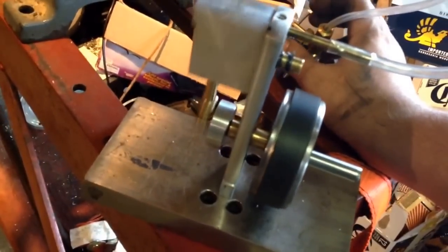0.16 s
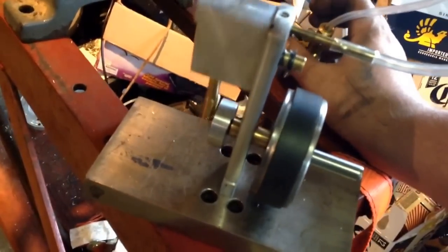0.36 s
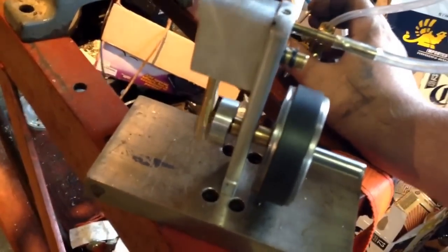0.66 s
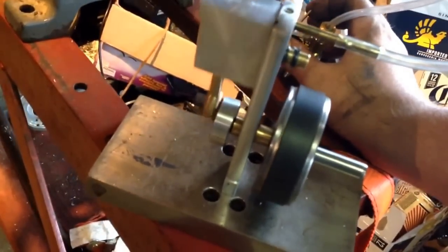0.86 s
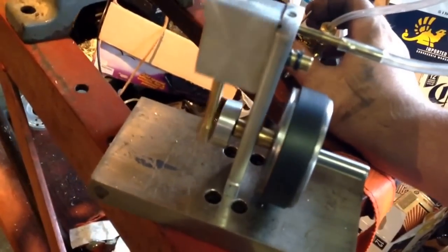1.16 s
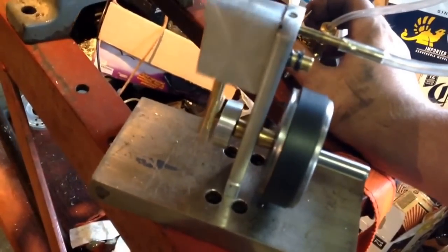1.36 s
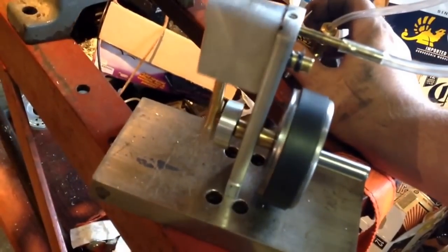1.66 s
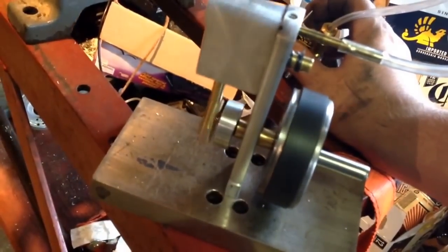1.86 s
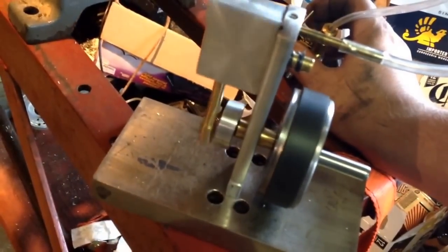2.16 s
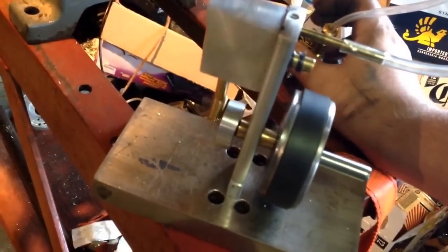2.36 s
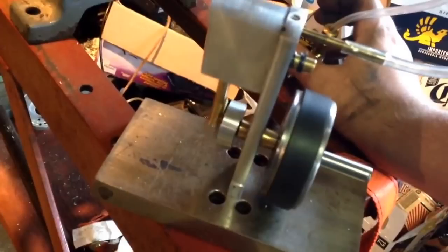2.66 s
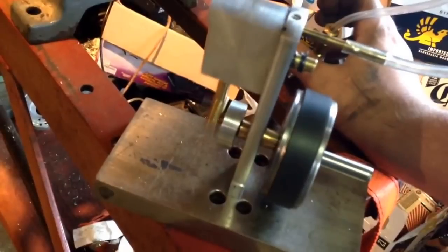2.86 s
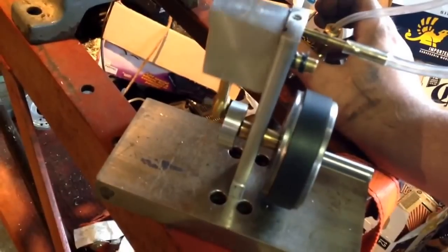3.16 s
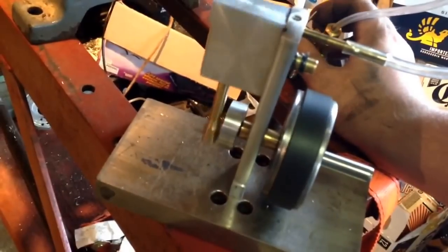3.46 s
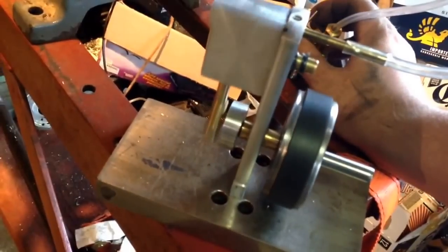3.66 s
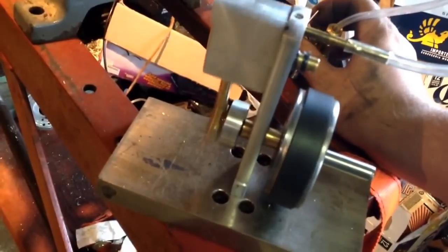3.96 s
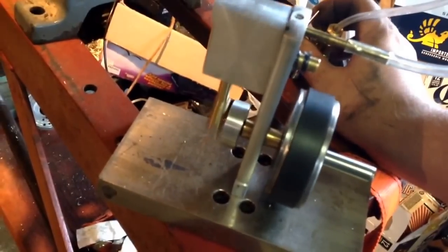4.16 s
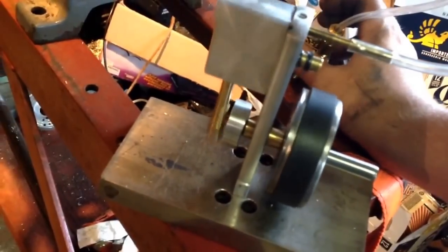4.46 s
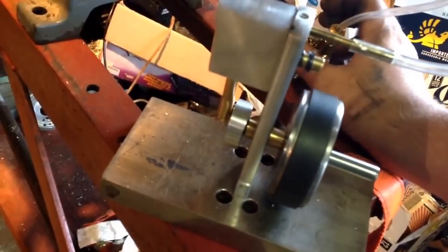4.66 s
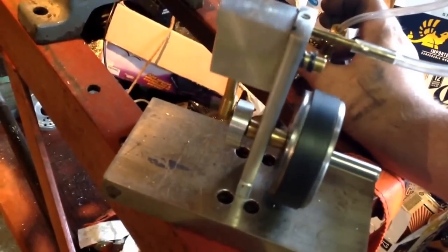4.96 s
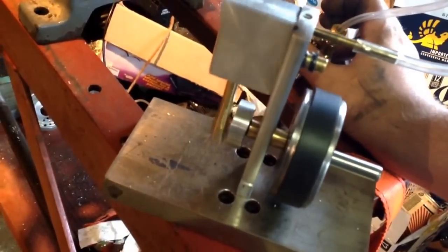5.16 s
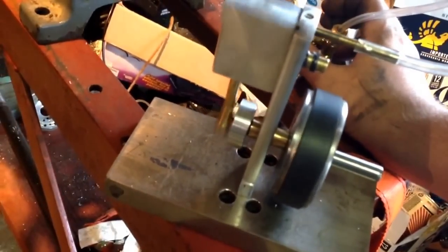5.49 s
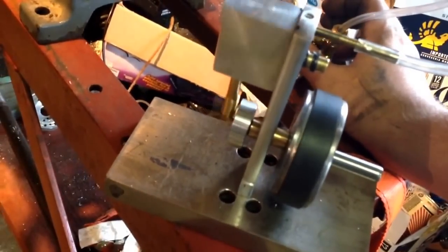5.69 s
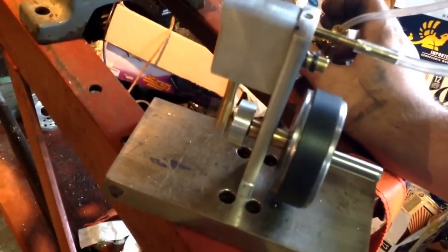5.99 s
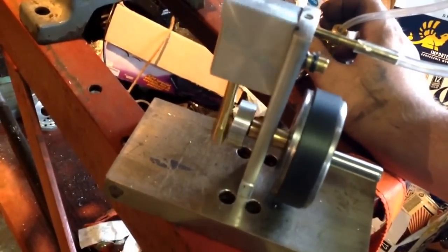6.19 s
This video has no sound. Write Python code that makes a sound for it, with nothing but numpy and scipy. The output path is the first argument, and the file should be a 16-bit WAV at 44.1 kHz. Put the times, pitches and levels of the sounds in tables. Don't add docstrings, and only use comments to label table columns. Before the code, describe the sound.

A steady high air hiss and dim workshop murmur run throughout. Over them, a little compressed-air engine beats at once with fast spitting puffs, one stroke stronger and chuffing lower, the other crisper after a tiny tick. The beat loosens gradually without stopping. Close, dry camera sound in a small workshop, with little bass and slightly dulled extreme treble.

```python
import sys
import numpy as np
from scipy import signal
from scipy.fft import rfft, irfft, next_fast_len
from scipy.io import wavfile
from scipy.ndimage import uniform_filter1d, minimum_filter1d, map_coordinates

SR = 44100
rng = np.random.default_rng(int(sys.argv[2]) if len(sys.argv) > 2 else 0)


def generate_wav(signal):
    frames = np.transpose(np.atleast_2d(signal))
    scaled = np.clip(frames, -1, 1) * 32767
    pcm = np.round(scaled).astype(np.int16)
    wavfile.write(sys.argv[1], SR, pcm)


def natural_amplitude(level_db):
    exponent = np.asarray(level_db, float) / 20
    return 10 ** exponent


N = 279153
TURNS = 55
FULL_SPEED = 10.4


def unit(x):
    return x / np.sqrt(np.mean(x ** 2) + 1e-20)


def along(points, hz):
    f, v = np.transpose(points)
    return np.interp(np.log(hz + 1), np.log(f + 1), v)


def wobble(rate):
    knots = rng.standard_normal(int(N * rate / SR) + 4)
    return map_coordinates(knots, [np.arange(N) * rate / SR])


def filtered(x, response):
    m = next_fast_len(N + SR // 2)
    return irfft(rfft(x, m) * response(np.fft.rfftfreq(m, 1 / SR)), m)[..., :N]


def modes(table):
    return lambda f: sum(natural_amplitude(db) * 1j * f * w / (c * c - f * f + 1j * f * w) for c, w, db in table)


# time in seconds, turns done.
SHAFT = [(0.0727, 0), (0.4595, 4), (0.8445, 8), (1.2265, 12), (1.5155, 15), (1.7116, 17), (1.9154, 19),
         (2.1287, 21), (2.3542, 23), (2.7005, 26), (3.1673, 30), (3.6375, 34), (3.878, 36), (4.1308, 38),
         (4.4042, 40), (4.8252, 43), (5.5345, 48), (6.2447, 53)]


def crank_s(turns):
    s, done = np.transpose(SHAFT)
    k = np.clip(np.searchsorted(done, turns) - 1, 0, len(s) - 2)
    span, rise = done[k + 1] - done[k], s[k + 1] - s[k]
    period = np.gradient(s, done, edge_order=2)
    u = (turns - done[k]) / span
    bend_start, bend_end = span * period[k] - rise, span * period[k + 1] - rise
    return s[k] + u * rise + u * (1 - u) * ((1 - u) * bend_start - u * bend_end)


def speed_db(s):
    when = crank_s(np.arange(TURNS))
    return np.interp(s, when, -20 * np.log10(np.gradient(when) * FULL_SPEED))


# time in seconds, pressure at the second port in dB, slowness of opening in dB.
VALVE = [(0, -17, 0), (.3, -17, .5), (1.0, -17.5, -1), (1.252, -19.5, 1), (2.15, -22, 0.43),
         (2.4, -18.5, .5), (3.599, -18, .3), (3.851, -20, 0), (4.1, -23, 1.1), (4.3, -19.5, 0),
         (4.701, -20, -0.5), (4.95, -20.5, 2), (5.15, -20, 0.05), (6.33, -20.5, -0.5)]
# start in seconds, slowness in dB, roar in dB, chuff note in Hz.
ODD_PUFFS = [(.221, 0, -29, 1890), (.318, -1, -29.5, 1290), (.414, 0.5, -29, 1590), (.704, 0.5, -35, 1220),
             (.895, 1.5, -35.5, 1860), (1.183, 1.5, -33.5, 2210), (1.278, -2.5, -27, 1700),
             (1.471, -0.5, -30, 970), (1.568, 0.5, -29, 1406), (1.666, -2.5, -25.5, 1740),
             (1.765, 2.5, -30, 1534), (1.973, -0.5, -27.5, 1916), (2.078, -1, -28, 2030),
             (2.301, -1.5, -30, 1140), (2.53, -2, -29.5, 2403), (2.646, 0.2, -30.5, 1460),
             (2.763, -3.5, -30, 1373), (2.879, -0.5, -27.5, 1675), (2.993, 1.1, -30.5, 1750),
             (3.701, -2, -28.5, 1637), (3.821, -1.5, -29.5, 1563), (4.202, -2.5, -30.5, 1600),
             (5.041, 0.5, -32.5, 1122), (5.325, -.5, -33.5, 2015), (5.467, -2, -29.5, 1630),
             (5.61, -1, -28.5, 1930), (5.892, 0, -30, 1980), (6.035, 0, -31, 1670), (6.177, 0.5, -30, 1490),
             (6.32, 0.5, -33, 960)]
# start in seconds, roar in dB.
ODD_ROARS = [
    (.845, -28),
    (.94, -32),
    (1.323, -26),
    (2.021, -30.5),
    (4.002, -32),
    (4.131, -34.5),
    (6.245, -30.5),
]
TOP_LEAD_TURNS, SLOW_EARLY_S, JITTER_S = .472, 0.00058, 0.000505
TOP_OPEN_TURNS, LOW_OPEN_TURNS = 0.053, 0.052
TOP_JET_DB, TOP_ROAR_DB, LOW_ROAR_DB, CHUFF_HZ = -14, -30.5, -30, 1750
THUMP_DB, TICK_DB = -52.5, -41
JET_GROWS, ROAR_GROWS, THUMP_GROWS = 0.53, 0.56, 2.4


def strokes():
    s, pressure_db, slow_db = np.transpose(VALVE)
    top = crank_s(np.arange(TURNS) - TOP_LEAD_TURNS)
    low = crank_s(np.arange(TURNS - 1))
    luck = rng.standard_normal((TURNS, 9)).T

    speed = speed_db(top)
    slow = np.interp(top, s, slow_db) + .4 * luck[0]
    roar = TOP_ROAR_DB + ROAR_GROWS * speed + 1.65 * luck[1]
    chuff_hz = CHUFF_HZ * natural_amplitude(1.7 * luck[2])
    for when, odd_db, roar_db, hz in ODD_PUFFS:
        k = np.argmin(np.abs(top - when))
        slow[k], roar[k], chuff_hz[k] = slow[k] + odd_db, roar_db, hz
    start = top - SLOW_EARLY_S * slow + JITTER_S * luck[3]
    jet_db = TOP_JET_DB + JET_GROWS * speed - 1.1 * slow
    ms = 1000 * TOP_OPEN_TURNS / FULL_SPEED * natural_amplitude(slow - speed)
    thump_db = THUMP_DB + THUMP_GROWS * speed + 1.5 * luck[4]
    first = [start, jet_db, roar, ms, chuff_hz, thump_db]

    luck, speed = luck[:, :-1], speed_db(low)
    slow = np.interp(low, s, slow_db) + 0.31 * luck[5]
    jet_db = np.interp(low, s, pressure_db) - 0.72 * slow + 0.63 * luck[6]
    roar = LOW_ROAR_DB + ROAR_GROWS * speed + 1.04 * luck[7]
    ms = 1000 * LOW_OPEN_TURNS / FULL_SPEED * natural_amplitude(slow - speed)
    tick_db = TICK_DB - 2.9 * np.abs(luck[8]) + 2.5
    for when, roar_db in ODD_ROARS:
        roar[np.argmin(np.abs(low - when))] = roar_db
    return np.transpose(first), np.transpose([low, jet_db, roar, ms, tick_db])


# pitch in Hz, level in dB per Hz.
LEAK_COLOUR = [(880, -27), (1500, -31.5), (2960, -8.5), (3990, -7.5), (5090, -1.5), (5940, -4.5),
               (6540, -3), (7640, -5.5), (8420, -3), (9730, -6), (12300, -5.5), (13300, 1), (15200, -2.5)]
# pitch in Hz, level in dB per Hz.
SHOP_COLOUR = [(18, -44), (30, -0.5), (104, -11), (209, -11), (261, -10.5), (365, -10.5), (548, 0),
               (613, -5), (794, 0), (1190, -10), (1630, -4), (2500, -6), (3250, -18), (5500, -120)]
# pitch in Hz, level in dB.
HUM = [(120, -78.5), (565, -68)]
LEAK_DB, SHOP_DB, SHOP_GROWS = -34.5, -50, 0.72


def air(first):
    t, s = np.arange(N) / SR, np.transpose(first)[0]
    angle = 2 * np.pi * np.interp(t, s, np.arange(len(s)))
    breathing_db = 0.29 * np.cos(angle - 2.5) + 0.5 * np.cos(2 * angle - 3.5)
    leak_db = LEAK_DB - 2.0 + 0.54 * wobble(2.34) + breathing_db + 1.75 * wobble(30)
    shop_db = SHOP_DB - 1.0 + SHOP_GROWS * speed_db(t) + 1.8 * wobble(2.02) + 0.75 * wobble(12)
    leak = unit(filtered(rng.standard_normal(N), lambda hz: natural_amplitude(along(LEAK_COLOUR, hz))))
    shop = unit(filtered(rng.standard_normal(N), lambda hz: natural_amplitude(along(SHOP_COLOUR, hz))))
    hum = np.zeros(N)
    for hz, db in HUM:
        hum += natural_amplitude(db + 3.0 + 2.9 * wobble(6.6)) * np.sin(2 * np.pi * hz * t + 2.1 * wobble(9))
    plate_db = -55 - 12.0 * t + 2.7 * wobble(6.5)
    fading_hum = natural_amplitude(plate_db) * np.sin(2 * np.pi * 1022 * t + 2.1 * wobble(4.7))
    return natural_amplitude(leak_db) * leak + natural_amplitude(shop_db) * shop + hum + fading_hum


# turns after the first puff, pitch in Hz, width in Hz, level in dB, length in ms.
GEAR = [
    (-.22, 628, 200, -52, 11),
    (-.16, 807, 227, -48.5, 9),
    (-.09, 946, 300, -51.5, 13),
    (.17, 794, 356, -56, 8.5),
    (.23, 1035, 200, -58.5, 8.6),
    (.36, 8400, 3000, -35, 3.8),
    (.36, 12200, 1500, -40, 4),
]


def gear(first):
    s = np.transpose(first)[0]
    out, t = np.zeros(N), np.arange(SR // 20) / SR
    for turns, hz, width, db, ms in GEAR:
        burst, u = np.zeros(N + SR), t / ms * 2000
        swell = np.e * u * np.exp(-u)
        luck = rng.standard_normal((len(s), 2))
        for when, (scatter, slip) in zip(s + turns * np.gradient(s), luck):
            i = round(max(when + .002 * slip, 0) * SR)
            burst[i:][:len(t)] += natural_amplitude(2 * scatter) * swell * rng.standard_normal(len(t))
        ring = modes([(hz, width, 0)])
        level = natural_amplitude(db) * np.sqrt(2 * SR / np.pi / width)
        out += level * filtered(burst[:N], lambda f: ring(f) ** 2)
    return out


def flow(rows, column, lag, rise, hold, fall):
    out = np.zeros(N + SR)
    t = np.arange(-SR // 40, SR // 10) / SR
    for row in rows:
        u = t / (row[3] / 1000) - lag
        dying = np.exp(-np.maximum(u - hold, 0) / fall)
        out[round(row[0] * SR):][:len(t)] += natural_amplitude(row[column]) * dying / (1 + np.exp(-u / rise))
    return out[SR // 40:][:N]


def jet(envelope, port, gusty_db, eddy_db):
    lumps = natural_amplitude(gusty_db * wobble(260) + eddy_db * wobble(2500))
    gain = np.sqrt(np.mean(np.abs(modes(port)(np.arange(SR // 2))) ** 2))
    return filtered(envelope * unit(lumps * rng.standard_normal(N)), modes(port)) / gain


def hiss_edge(hz):
    return (1j * hz / 5200) ** 4 / (1 + (hz / 5200) ** 8) ** .5


def puffs(rows, layers):
    sounds = []
    for column, port, db, shape, gusty, eddy in layers:
        sounds.append(natural_amplitude(db) * jet(flow(rows, column, *shape), port, gusty, eddy))
    whistle, blast, sweep, roar, draught = sounds
    hiss = filtered(whistle + blast + sweep, lambda hz: np.abs(hiss_edge(hz)))
    return hiss + roar + draught


JET, ROAR = 1, 2
# pitch in Hz, width in Hz, level in dB.
DRAUGHT = [(1420, 1900, -4.5), (2270, 500, -3), (3530, 1140, 2.5)]
# pitch in Hz, width in Hz, level in dB.
TOP_WHISTLE = [(9830, 350, 1), (13170, 510, -5.5)]
TOP_PORT = [(5630, 290, -10), (6040, 345, 2.5), (7500, 1200, -2.5), (8890, 620, -7), (9620, 330, 1.5),
            (11180, 630, -2), (12530, 210, 2), (13620, 270, 3), (15000, 1700, -3.5)]
TOP_SWEEP = [(5560, 1800, 6), (7720, 3100, 8), (10400, 480, 5), (12200, 1800, -7), (15100, 1200, 0)]
TOP_ROAR = [(726, 390, -12), (1600, 870, 6), (2130, 730, -2), (3550, 700, 2.5)]


def first_exhaust(first):
    return puffs(first, [
        (JET, TOP_WHISTLE, -3, (0.1, 0.3, 0.41, 1.0), 1.2, 1.2),
        (JET, TOP_PORT, 1.5, (0.13, 0.32, 0.96, 0.98), 1.6, 1.3),
        (JET, TOP_SWEEP, -11, (1.33, 0.13, 1.17, 1.72), 1.5, 1.5),
        (ROAR, TOP_ROAR, 2.5, (0.19, 0.74, 1.0, 0.61), 1.8, 1.2),
        (JET, DRAUGHT, -23, (1.13, 0.38, 1.52, 1.24), 1.5, 1.2)])


def chuff(first):
    s, hz = np.transpose(first)[[0, 4]]
    pitch = hz[np.clip(np.searchsorted(s + .03, np.arange(N) / SR), 0, len(s) - 1)]
    phase = 2 * np.pi * np.cumsum(pitch + 120 * wobble(150)) / SR
    note = np.cos(phase) * natural_amplitude(2.1 * wobble(180))
    return natural_amplitude(-4.5) * flow(first, ROAR, .4, .25, .6, .5) * note


KNOCK_DB, KNOCK_GROWS = -65, 2.5


def frame(nudge, first):
    s, thump_db = np.transpose(first)[[0, 5]]
    pull = np.zeros(N + SR)
    pull[np.round((s + .0035) * SR).astype(int)] = -natural_amplitude(thump_db + 50.5)
    deep, short = modes([(68, 70, 0), (220, 150, -16)]), modes([(170, 110, 0), (70, 60, -6)])
    thump = filtered(pull[:N], lambda hz: np.abs(deep(hz)) / (1 + (hz / 230) ** 2))
    push = np.roll(nudge, -40)
    knock = unit(filtered(push, lambda hz: np.abs(short(hz)) / (1 + (hz / 240) ** 6)))
    knock_db = KNOCK_DB + KNOCK_GROWS * speed_db(np.arange(N) / SR) + 2.5 * wobble(2.9)
    return thump + natural_amplitude(knock_db) * knock


# pitch in Hz, width in Hz, level in dB.
TICK = [(800, 700, 0), (1500, 700, -3), (2800, 1200, -2), (4500, 1400, 2)]


def valve(second):
    s, tick_db = np.transpose(second)[[0, 4]]
    at = np.round((s - 0.066 * np.gradient(s)) * SR).astype(int)
    burst, nudge, t = np.zeros(N + SR), np.zeros(N), np.arange(SR // 100) / SR
    for i, db in zip(at, tick_db):
        burst[i:i + len(t)] += natural_amplitude(db + 13 - 60 * t / .009) * rng.standard_normal(len(t))
    nudge[at] = natural_amplitude(rng.normal(0, 0.88, len(at)))
    return filtered(burst[:N], modes(TICK)), nudge


# pitch in Hz, width in Hz, level in dB.
LOW_WHISTLE = [(7510, 1100, 0.5), (10470, 560, -3.5)]
LOW_PORT = [(6120, 250, 3.5), (7640, 890, 5.5), (8840, 380, 2), (9630, 230, 5), (11000, 230, -4),
            (13900, 540, -37), (14700, 480, -9)]
LOW_SWEEP = [(5600, 2400, 3.5), (7350, 2200, -30), (9550, 670, 5.5), (10840, 740, 5.5), (13000, 700, 4),
             (14100, 460, 4)]
LOW_ROAR = [(1980, 980, -3), (2580, 240, -1), (3890, 910, 5.5), (4870, 330, -23)]


def second_exhaust(second):
    return puffs(second, [
        (JET, LOW_WHISTLE, 1.5, (.01, .05, .5, .6), 1.2, 1.2),
        (JET, LOW_PORT, -1.5, (0.1, 0.3, 1.36, 1.36), 1.4, 1.3),
        (JET, LOW_SWEEP, -9, (0.35, 0.13, 3.44, 1.6), 1.5, 1.5),
        (ROAR, LOW_ROAR, 1.5, (.7, 0.39, 0.82, .9), 1.8, 1.2),
        (JET, DRAUGHT, -22, (0.5, 0.25, 2.4, 2.8), 1.5, 1.2)])


# pitch in Hz, time to fall by 60 dB in seconds.
SHOP = [(300, 0.075), (3000, 0.073), (12000, 0.017)]


def echo(x):
    hz, t, z = signal.stft(rng.standard_normal(SR // 2), SR, nperseg=256)
    tail = signal.istft(z * natural_amplitude(-60 * t / along(SHOP, hz)[:, None]), SR, nperseg=256)[1]
    return signal.fftconvolve(np.pad(x, (300, 0)), tail / np.linalg.norm(tail))[:N]


def scene():
    first, second = strokes()
    steady = air(first)
    tick, nudge = valve(second)
    motor = gear(first) + first_exhaust(first) + chuff(first) + tick + second_exhaust(second)
    motor = filtered(motor, lambda hz: hz ** 3 / np.sqrt(hz ** 6 + 400.0 ** 6))
    return (motor + natural_amplitude(-17.5) * echo(motor) + frame(nudge, first) + steady)[None]


# pitch in Hz, width in Hz, depth in dB.
DIPS = [(5060, 375, -4), (6400, 250, 0), (8400, 150, -5), (10600, 170, -5.5), (12300, 490, -5),
        (14300, 170, -9.5)]


def microphone(x):
    bass = lambda hz: hz ** 6 / np.sqrt(hz ** 12 + 44.0 ** 12)
    shell = lambda hz: natural_amplitude(sum(db * np.exp(-((hz - c) / w) ** 2) for c, w, db in DIPS))
    heard = filtered(x, lambda hz: bass(hz) * shell(hz))
    return heard / (1 + np.abs(heard / .7) ** 4) ** .25


TOP_HZ = 15290
STARVED_HZ, STARVED_PERCENT = 8000, 8


def starved(x):
    hz, _, z = signal.stft(x, SR, nperseg=2048)
    band = uniform_filter1d(np.abs(z) ** 2, size=9, axis=-2)
    treble = (hz > STARVED_HZ) & (hz < TOP_HZ)
    depth = band / uniform_filter1d(band, size=120, axis=-2)
    deepest = minimum_filter1d(depth, size=7, axis=-2)
    weak = treble[:, None] & (deepest < np.percentile(deepest[:, treble], STARVED_PERCENT))
    return signal.istft(z * ~weak, SR, nperseg=2048)[1][:, :N]


def low_pass(x):
    return signal.sosfilt(signal.butter(12, 16470, fs=SR, output="sos"), x)


def record(dry):
    edge = lambda hz: natural_amplitude((hz > TOP_HZ) * (-22 - np.clip(hz - TOP_HZ, 0, 2500) * .06))
    mix = filtered(starved(microphone(dry)), edge)
    return low_pass(mix)


dry = scene()
out = record(dry)
generate_wav(out)
```